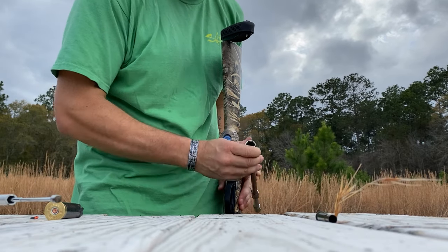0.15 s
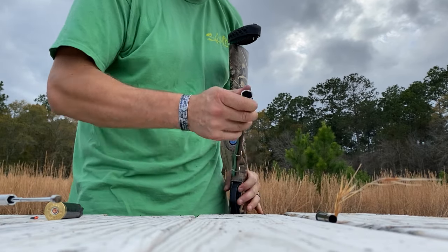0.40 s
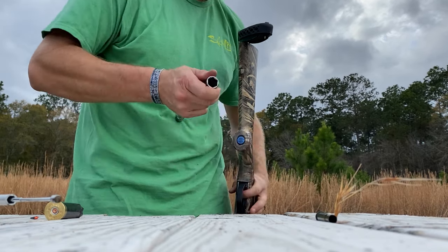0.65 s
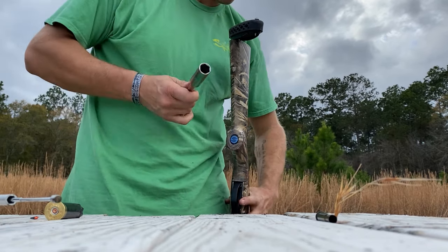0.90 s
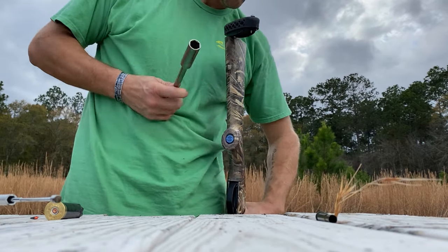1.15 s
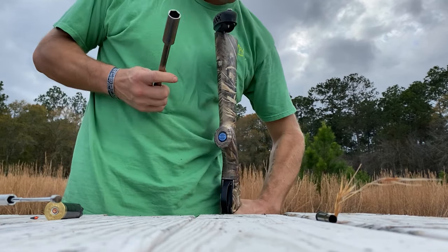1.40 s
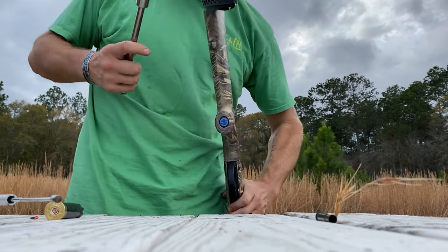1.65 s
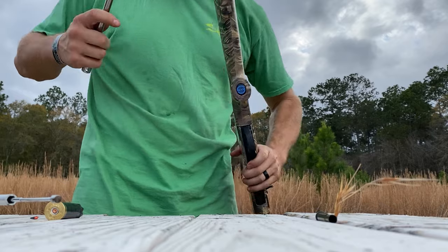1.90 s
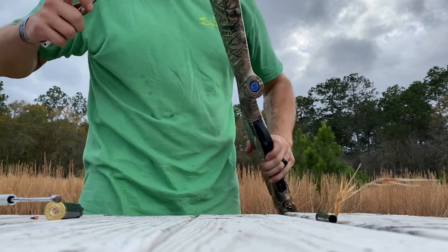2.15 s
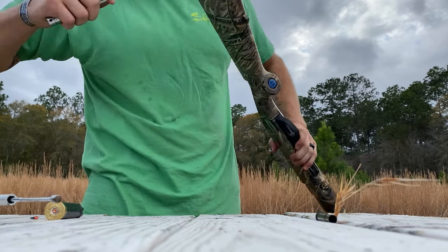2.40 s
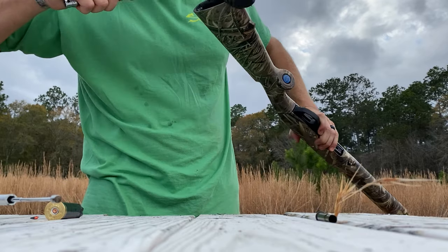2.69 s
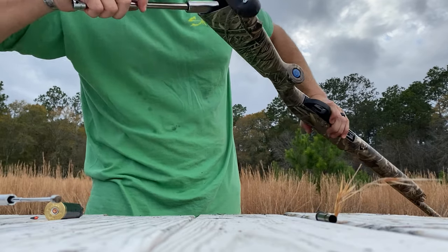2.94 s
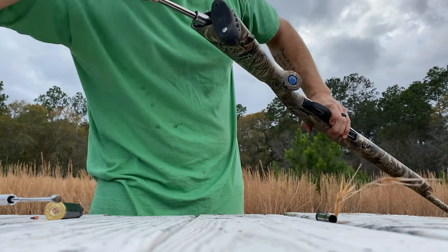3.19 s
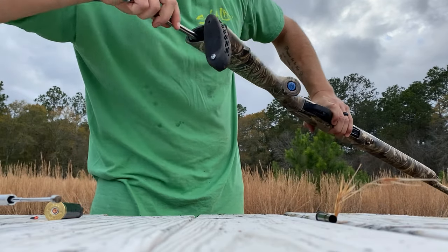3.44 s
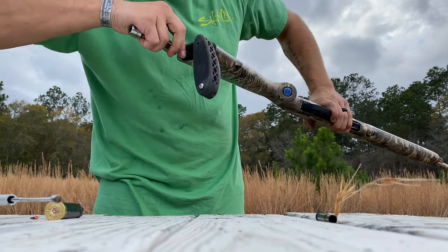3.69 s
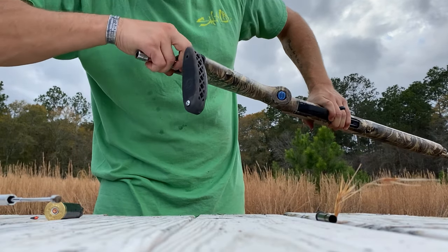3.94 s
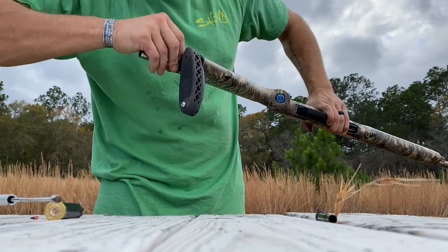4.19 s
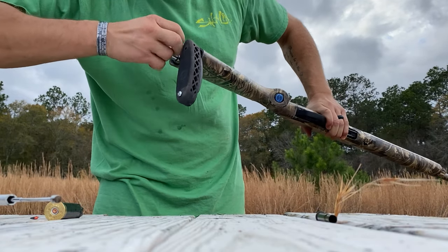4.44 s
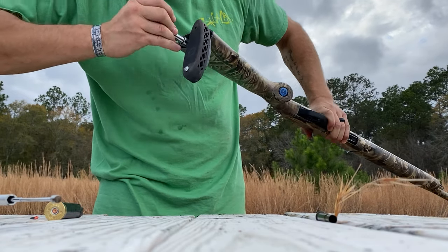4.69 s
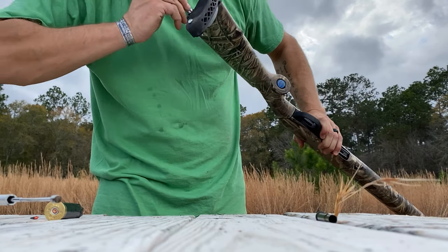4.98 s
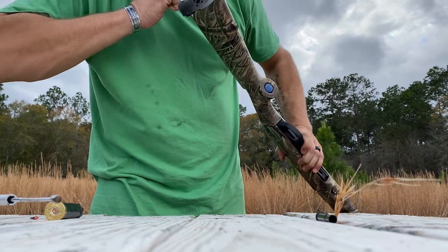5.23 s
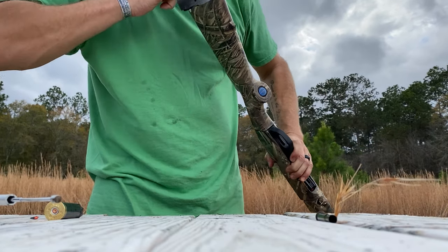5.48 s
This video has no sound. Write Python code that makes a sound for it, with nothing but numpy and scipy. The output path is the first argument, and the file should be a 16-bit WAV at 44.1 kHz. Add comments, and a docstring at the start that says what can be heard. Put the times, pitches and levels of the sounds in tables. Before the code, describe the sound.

Close stereo pickup at an outdoor table by a grassy field. Soft rubbing and cloth rustle with a few small ticks come first, then a loud hollow knock near three seconds as a steel socket tool meets a shotgun stock. It scrapes inward, rattles and clacks hard around four seconds, then gives smaller hollow knocks and rubs. A high cricket, faint trilling insects and low far traffic continue underneath.

```python
"""Outdoors, a steel socket tool is pushed into the hollow stock of a shotgun: it knocks, rubs and rattles inside.
Blows and stick-slip grains ring the modes of cavity, shell, tube, edge and steel; one tick on the tool is dry and dull.
Shaped noise makes far traffic, hissing grass, far insects and rustling cloth; gliding sine pulses make a
cricket and a trilling insect, and short sines make tiny pips.
Two close microphone ports hear it all, the treble out of step between them."""
import sys
import numpy as np
from scipy import signal
from scipy.fft import rfft, irfft
from scipy.io import wavfile

SR = 44100
rng = np.random.default_rng(int(sys.argv[2]) if len(sys.argv) > 2 else 0)


def store_pcm(level_fs):
    """Save levels as 16-bit WAV."""
    pcm = np.round(np.clip(level_fs, -1, 1) * 32767).astype(np.int16)
    wavfile.write(sys.argv[1], SR, np.atleast_2d(pcm).T)


def gain_from_db(level_db):
    """Convert decibel levels to linear amplitude factors (20 dB per decade)."""
    decades = np.asarray(level_db, float) / 20
    return 10 ** decades


N = 246959
TIME = np.arange(N) / SR
HZ = np.maximum(np.fft.rfftfreq(N, 1 / SR), 1)


def rms_one(x):
    """Scale to unit rms."""
    return x / np.sqrt(np.mean(x ** 2) + 1e-20)


def in_time(rows):
    """Read every column of a time curve sample by sample."""
    s, *columns = np.transpose(rows)
    return [np.interp(TIME, s, column) for column in columns]


def at_hz(points):
    """Read a spectrum table at every FFT bin, along log frequency; points below 30 Hz count as 30 Hz."""
    hz, value = np.transpose(points)
    return np.interp(np.log(HZ), np.log(np.maximum(hz, 30)), value)


def coloured(spectrum_db):
    """White noise weighted by a level for every FFT bin."""
    return irfft(rfft(rng.standard_normal(N)) * gain_from_db(spectrum_db), N)


def drift(rate_hz):
    """Slow random wander: straight lines between normal draws, spread about 1."""
    knots = rng.standard_normal(int(TIME[-1] * rate_hz) + 2)
    return np.interp(TIME * rate_hz, np.arange(len(knots)), knots) * np.sqrt(3 / 2)


def dying(times, levels_db, t60_s):
    """An exponential decay started at every given moment; overlapping decays add."""
    kicks = np.zeros(N)
    kicks[np.round(times * SR).astype(int)] = gain_from_db(levels_db)
    return signal.lfilter([1], [1, -gain_from_db(-60 / (t60_s * SR))], kicks + 1e-18)


def crack(times, levels_db, low_hz, high_hz, t60_s):
    """The first instant of a hard contact: a dying burst of noise in one band."""
    burst = dying(times, levels_db, t60_s) * rng.standard_normal(N)
    band = signal.butter(2, [low_hz, high_hz], "band", fs=SR, output="sos")
    return signal.sosfilt(band, burst)


def strike(times, levels_db, modes, rise_s, spread_db, detune, tuning=1):
    """Every blow reaches every mode with its own strength and slightly other pitch, as grip and place change."""
    hz, mode_db, t60_s = np.transpose(modes)[:, :, None]
    chance = rng.standard_normal((len(times), 2 * len(modes)))
    t = TIME[:SR // 8]
    shape = gain_from_db(-60 * t / t60_s) * (1 - np.exp(-t / rise_s)) ** 2
    shape /= shape.max(axis=1, keepdims=True)
    signs = (-1) ** np.arange(len(modes))[:, None]
    out = np.zeros(N + SR)
    for s, level_db, tune, draw in zip(times, levels_db, np.broadcast_to(tuning, len(times)), chance):
        strength, pitch = draw.reshape(2, -1, 1)
        gain = signs * gain_from_db(level_db + mode_db + spread_db * strength)
        tones = np.sin(2 * np.pi * hz * tune * (1 + detune * pitch) * t)
        start = round(s * SR)
        out[start:start + len(t)] += (gain * shape * tones).sum(axis=0)
    return out[:N]


def grains(per_s, spread_db):
    """Random clicks of uneven size and sign, scaled to rms 1."""
    sizes = gain_from_db(spread_db * np.minimum(rng.exponential(1, N), 4)) * rng.choice([-1, 1], N)
    return rms_one(sizes * (rng.random(N) < per_s / SR))


def excite(drive, modes, ring_scale, tuning=1):
    """Drive modes of movable pitch: shift each to zero, smooth, shift back; a white drive keeps its rms."""
    out, power = 0, 0
    turns = np.cumsum(np.broadcast_to(tuning, N)) * 2 * np.pi / SR
    for k, (hz, mode_db, t60_s) in enumerate(modes):
        r = gain_from_db(-60 / (t60_s * ring_scale * SR))
        spin = np.exp(1j * hz * turns)
        smooth = signal.lfilter([1], [1, -r], drive / spin + 1e-18)
        out = out + gain_from_db(mode_db) * (-1) ** k * np.imag(smooth * spin)
        power += gain_from_db(2 * mode_db) / (2 * (1 - r * r))
    return out / np.sqrt(power)


# how far the background differs between the ports: pitch_hz, level_db against the like part
DIFFUSE_SPECTRUM = [(60, -35), (200, -11), (500, -2.5), (1200, -4.5), (2500, -12.5), (5000, -8.5),
                    (11000, -16.5), (14000, -28)]


def diffuse():
    """Spectrum of the unlike part against the like part, in dB per bin."""
    return at_hz(DIFFUSE_SPECTRUM)


# rumble and grass as one noise colour: pitch_hz, relative level_db per Hz
AIR_SPECTRUM = [(20, -35.5), (31, -12), (40, -44), (50, -5.5), (80, 2), (115, -5.5), (150, -14.5),
                (237, -17), (306, -26.5), (395, -22.5), (763, -22), (1200, -28.5), (2120, -38),
                (4000, -52.5)]
# breeze and traffic: time_s, rumble level_db, grass level_db (both before the trims below)
GUSTS = [(0.0, -53.5, -53), (0.4, -53, -57.5), (1.0, -55.5, -59), (1.5, -55.5, -58), (2.3, -56, -61),
         (3.2, -52.5, -59), (3.9, -55, -60), (4.9, -54, -56), (5.2, -55, -59), (5.6, -55, -59)]


def traffic_and_grass():
    """Noise split at 170 Hz into rumble and grass; a resonance in the rumble is a far engine's hum."""
    rumble_db, grass_db = in_time(GUSTS)
    colour = at_hz(AIR_SPECTRUM) - 60 * (HZ > 4200)
    air = coloured(colour)
    low = signal.sosfiltfilt(signal.butter(2, 170, fs=SR, output="sos"), air)
    hum = excite(low, [(55.2, 0, 0.1856)], 1)  # pitch_hz, level_db, t60_s
    rumble = (rms_one(low) + gain_from_db(-2) * rms_one(hum)) * gain_from_db(rumble_db + 1.0)
    grass = rms_one(air - low) * gain_from_db(grass_db - 1.5 + 1.15 * drift(5.714))
    # the unlike part has opposite sign at the two ports
    unlike = gain_from_db(-55) / np.std(air) * coloured(colour + diffuse()) * [[1], [-1]]
    return rumble + grass, unlike


# far insects and leaves: pitch_hz, relative level_db per Hz
CHORUS_SPECTRUM = [(3500, -24.5), (4700, -6.5), (5200, -8.5), (6200, -3), (7000, -8.5), (7500, 1.5),
                   (8500, 7.5), (9400, -7), (9750, -25), (10500, -27), (15500, -10.5), (16300, -47)]


def far_insects():
    """Treble noise of insects and leaves whose level throbs fast and wanders."""
    throb_per_s, throb_db = 47.0, 2.2
    colour = at_hz(CHORUS_SPECTRUM) - 60 * (HZ < 3300)
    throb = throb_db * np.sin(2 * np.pi * throb_per_s * TIME + drift(3.0))
    like = gain_from_db(-76.5 + 1.2 * drift(42.0) + throb) * rms_one(coloured(colour))
    unlike = gain_from_db(-81.5) * np.array([rms_one(coloured(colour + diffuse())) for port in range(2)])
    return like, unlike


# cloth rustles: peak_s, level_db (before the cloth gains), fade_s for a fall of 20 dB
RUSTLES = [(.03, -80, .045), (.19, -86, .4), (.65, -94, .12), (.84, -80, .14), (1.04, -81.5, .16),
           (1.28, -75, .02), (1.87, -78.5, .055), (2.3, -95, .3), (2.59, -92, .1), (2.97, -80, .03),
           (3.34, -73, .03), (3.42, -86, .15), (3.62, -79.5, .28), (3.84, -79, .02), (3.885, -82, .045),
           (3.96, -85, .1), (4.15, -72, .015), (4.25, -76, .035), (4.62, -91, .15), (4.82, -78, .05),
           (5.02, -81.5, .08), (5.24, -90, .1)]


def rustling():
    """Level curve of the cloth in dB: each rustle rises fast and fades evenly, down to a resting level."""
    rise_share, rest_db = 0.6, -104  # rise time as a share of the fade; level between rustles
    s, level_db, fade_s = np.transpose(RUSTLES)[:, :, None]
    away_s = np.where(TIME > s, TIME - s, (s - TIME) / rise_share)
    return np.maximum((level_db - 20 * away_s / fade_s).max(axis=0), rest_db)


# colour of the cloth: pitch_hz, relative level_db per Hz
CLOTH_SPECTRUM = [(3000, -35.5), (6000, -1.5), (10000, 0.5), (15500, 4), (16300, -56.5)]


def cloth():
    """Treble noise follows the rustle curve with a quick random flutter, partly unlike at the ports."""
    near = at_hz(CLOTH_SPECTRUM)
    around = near + diffuse()
    level = gain_from_db(rustling() + 2.9 * drift(60.0))
    noises = level * [rms_one(coloured(colour)) for colour in (near, around, around)]
    return gain_from_db(8.0) * noises[0], gain_from_db(5.0) * noises[1:]


def background():
    """Sum traffic, grass, far insects and cloth into a like part and an unlike part."""
    likes, unlikes = zip(traffic_and_grass(), far_insects(), cloth())
    return sum(likes), sum(unlikes)


def pulse(centre_s, width_s, level_db, hz, glide_hz):
    """One wing stroke: a sine under a bell, gliding by glide_hz from one width before centre to one after."""
    first = max(int((centre_s - 3 * width_s) * SR), 0)
    t = TIME[first:int((centre_s + 3 * width_s) * SR)] - centre_s
    turns = hz * t + glide_hz * t ** 2 / (4 * width_s)
    tone = np.sin(2 * np.pi * turns + rng.uniform(0, 2 * np.pi))
    return first, gain_from_db(level_db) * np.exp(-.5 * (t / width_s) ** 2) * tone


# insect trills: start_s (first pulse), end_s, swell_s (full level after 0.8 of it), level_db
TRILL_TIMES = [(.0044, .35, 0.017, -73), (1.3, 1.88, 0.27, -72), (2.914, 3.69, .2, -72.5),
               (4.517, 5.19, 0.17, -72)]


def trills():
    """A steady run of wing strokes, each falling in pitch; the run swells in and its strokes vary in level."""
    per_s = 45.72
    out = np.zeros(N)
    for start_s, end_s, swell_s, level_db in TRILL_TIMES:
        for t in np.arange(start_s, end_s, 1 / per_s):
            fade_db = 20 * np.log10(min((t - start_s) / swell_s + .2, 1))
            stroke_db = level_db + fade_db + 2.2 * rng.standard_normal()
            first, tone = pulse(t, 0.002, stroke_db, 5990, -450.0)
            out[first:first + len(tone)] += tone
    return out


# cricket chirps: start_s (first pulse), level_db (before the weakening at both ends)
CHIRP_TIMES = [(0.199, -59.5), (0.493, -61.5), (0.933, -60.5), (1.222, -59), (1.555, -60.5), (1.791, -58),
               (1.997, -64), (2.219, -60), (2.451, -60), (2.67, -59), (2.948, -59.5), (3.23, -58.5),
               (3.527, -58.5), (3.834, -61), (4.146, -72.5), (4.459, -60.5), (4.707, -60.5), (4.996, -59.5),
               (5.278, -59.5)]


def cricket():
    """Each chirp is a row of wing strokes that start weak and low, climb, and sag at the end."""
    chirp_s, stroke_gap_s = 0.065, 0.0099
    out = np.zeros(N)
    for start_s, level_db in CHIRP_TIMES:
        for t in np.arange(0, chirp_s, stroke_gap_s):
            lack = np.exp(-t / .012) + np.exp((t - chirp_s) / .007)
            centre_s = start_s + t + 0.00037 * rng.standard_normal()
            hz = 9150 - 420 * lack + 40 * rng.standard_normal()
            first, tone = pulse(centre_s, 0.002, level_db - 5.0 * lack, hz, 60.0)
            out[first:first + len(tone)] += tone
    return out


# tiny pips: start_s, level_db, pitch_hz
PIP_TIMES = [(.563, -71, 5200), (.605, -72, 5150), (.638, -70, 5170), (0.773, -62, 5470), (.947, -63, 5400),
             (0.98, -63, 5630), (1.195, -62, 2880), (1.26, -60, 2850), (1.324, -62, 2960),
             (1.337, -53.5, 2870), (1.395, -65, 2920), (1.496, -60, 2950)]


def pips():
    """Each pip rings one short mode, 60 dB down after a fixed count of cycles."""
    cycles = 98.0
    return sum(strike([s], [level_db], [(hz, 0, cycles / hz)], 0.0005, 0, 0) for s, level_db, hz in PIP_TIMES)


# a dry, dull tick on the tool: start_s, level_db, modes as (pitch_hz, level_db, t60_s)
TOOL_TICK = (.774, -45, [(2260, 0, .0045), (1690, -4, .011)])


def dry_tick():
    """A dull, short tick of two quickly dying modes."""
    s, level_db, modes = TOOL_TICK
    return strike([s], [level_db], modes, 0.0005, 0, 0)


# the tool sinks into the stock and retunes tube and overtone: time_s, first tube mode's pitch_hz
DEPTH_CURVE = [(2.9, 1252), (3.2, 1280), (3.35, 1230), (3.42, 1450), (3.52, 1346), (3.63, 1223),
               (3.72, 1200), (4.3, 1183), (4.6, 1179), (5.0, 1172), (5.6, 1162)]


def tube_tuning(s):
    """Pitch ratio of the tube modes and their overtone at the given times."""
    return np.interp(s, *np.transpose(DEPTH_CURVE)) / TUBE_MODES[0][0]


def settling():
    """A knock leaves the tool shuffling: a strength that dies away after each one."""
    s, cavity_db = np.transpose(KNOCK_TIMES)[:2]
    return dying(s, cavity_db - 37, 0.35)


# sliding contact: time_s, level_db in cavity and shell modes, level_db in edge modes
RUB_CURVE = [(0, -66, -84), (.12, -54, -68), (.35, -69, -82), (1.05, -76, -77), (1.2, -63, -74),
             (1.6, -63, -75.5), (1.75, -77, -88), (2.9, -74, -93), (3.14, -80, -95), (3.28, -58, -78),
             (3.44, -61, -72), (3.49, -46.5, -66), (3.55, -47, -66), (3.62, -60, -64), (3.72, -63, -64),
             (3.78, -51, -64), (3.83, -64, -66), (4.04, -57, -72), (4.38, -63.5, -84), (4.68, -59, -86),
             (4.87, -66, -95), (5.05, -55, -75), (5.2, -61, -94), (5.35, -87, -84), (5.44, -65, -88),
             (5.6, -82, -89)]
# loose tool chattering: start_s, end_s, cavity and shell level_db, tube level_db, edge level_db
RATTLE_TIMES = [(3.17, 3.192, -45, -46.5, -63.5), (3.722, 3.758, -58, -47.5, -64),
                (3.885, 3.93, -50.5, -41, -51), (3.923, 3.982, -37.5, -36, -49),
                (4.043, 4.059, -49, -44, -70), (4.097, 4.119, -45, -53, -58),
                (4.187, 4.216, -45.5, -48, -56), (4.224, 4.26, -36.5, -32.5, -36.5),
                (4.282, 4.313, -44, -65, -58), (4.674, 4.686, -52, -58, -69),
                (4.809, 4.821, -47.5, -53, -64)]


def sliding():
    """Fine stick-slip under the hand and bursts of hard chatter drive the same modes."""
    rattle_db = np.full((4, N), -140.0)
    for start_s, end_s, low_db, tube_db, edge_db in RATTLE_TIMES:
        steel_db = edge_db - 10.5
        during = (TIME >= start_s) & (TIME < end_s)
        rattle_db[:, during] = np.array([low_db, tube_db, edge_db, steel_db])[:, None]
    dull_db, bright_db = in_time(RUB_CURVE)
    rub = gain_from_db([dull_db, (dull_db + bright_db) / 2 - 3.0, bright_db])
    rub = rub + settling() * gain_from_db([[0], [-12.0], [-22.0]])
    rub = rub * grains(4000.0, 2.1) * gain_from_db(1.2 * drift(30.0))
    chatter = gain_from_db(rattle_db) * grains(2000.0, 5.8)
    low_drive, tube_drive, edge_drive = rub + chatter[:3]
    tuning = tube_tuning(TIME)
    # steady contact shortens the ring of each mode
    low = excite(low_drive, CAVITY_MODES + SHELL_MODES, 0.51)
    tube = excite(tube_drive, TUBE_MODES, 0.92, tuning)
    edge = excite(edge_drive, EDGE_MODES + STEEL_MODES[:1], 0.6)
    overtone = gain_from_db(-2.5) * excite(edge_drive, OVERTONE_MODES, 0.85, tuning)
    steel = excite(chatter[3], STEEL_MODES, 0.51)
    return low + tube + edge + overtone + steel


# bright steel clicks: start_s, level_db, duller crack's level_db over the click (before the trims below)
CLICK_TIMES = [(0.7731, -54.5, 5), (0.981, -53.5, 2), (1.277, -47, 4), (1.8583, -56.5, 5),
               (2.003, -53.5, 9), (2.0408, -56, -6), (2.577, -59, -3), (2.9661, -43.5, 15), (3.237, -59, 6),
               (3.3233, -54.5, 18), (3.3432, -50, 0), (3.8833, -37.5, 18), (3.9035, -41.5, 6),
               (3.9332, -47, 23), (3.9524, -52.5, 16), (3.969, -51, 21), (3.9774, -40.5, 12),
               (4.0587, -56, 27), (4.0978, -30, 12), (4.14, -29, 23.5), (4.1784, -31.5, 1),
               (4.1842, -42, 15), (4.203, -55.5, 2.5), (4.226, -43, 14), (4.2337, -39, 0),
               (4.2424, -38.5, -3), (4.2524, -31.5, 8), (4.4873, -60, 12.5), (4.6099, -47, 22),
               (4.8114, -52.5, -5), (4.9666, -53, 18)]
# modes of the steel: pitch_hz, level_db, t60_s after a blow
STEEL_MODES = [(4415, 0.3, 0.005), (5400, -6.5, 0.011), (6020, -2.5, 0.011), (7140, -10, 0.008),
               (9200, -8, 0.0083), (11340, -12.5, 0.0056), (11200, -20, .008), (13800, -3, .035),
               (14030, -7, .04), (14400, -15, .03)]


def clicks():
    """Hard steel contact: ringing steel modes, a bright crack and a duller crack."""
    s, level_db, dull_db = np.transpose(CLICK_TIMES)
    steel = strike(s, level_db - 9.0, STEEL_MODES, 0.000097, 3.0, 0.031)
    bright = crack(s, level_db - 1.5, 4400, 9800, 0.011)
    return steel + bright + crack(s, level_db + dull_db - 3.0, 1800, 3320, 0.026)


# tool against stock: start_s (before the lead below), cavity level_db,
# then shell, tube and edge level_db over the cavity (all before the trims below)
KNOCK_TIMES = [(1.171, -52.5, 2, -14, -14.5), (1.334, -50.5, 5.5, 0, -5.5), (1.493, -61.5, 9, -12, -3.5),
               (2.97, -12.5, -7.5, -9, -17), (3.054, -54, -2, -21, -14.5), (3.177, -51.5, 15.5, 13.5, -2),
               (3.185, -41.5, 4.5, -27.5, -14), (3.326, -30.5, 3.5, -4, -11.5),
               (3.343, -28, -5.5, -12.5, -18), (3.477, -49, 1, -18, -16), (3.623, -35, -19, -10.5, -31),
               (3.732, -44.5, -29, -18, -19), (3.743, -50, -23, -.5, -16), (3.862, -60, 0, -6, -13),
               (3.883, -41.5, 7.5, 6, 1.5), (3.898, -35.5, -7, -23, -2.5), (3.933, -60, 20.5, 27.5, 24.5),
               (3.954, -44.5, 0, 6, -9), (3.977, -45.5, 10, 14, -3), (4.022, -49.5, -16, -18, -23),
               (4.057, -34, -1.5, 1.5, -5), (4.096, -50.5, 0, 14.5, 15.5), (4.141, -14, -11.5, 3, -11),
               (4.177, -33, -12.5, -2, -1.5), (4.201, -38.5, -7.5, -5.5, -26.5),
               (4.227, -36.5, -21, 2.5, -2), (4.241, -36.5, 2.5, 9, -6.5), (4.273, -31, -4, 2, -8),
               (4.304, -42, -22, -5, -10.5), (4.386, -51, -4.5, -13.5, -17.5),
               (4.44, -45.5, -.5, -5.5, -12.5), (4.489, -38, -10, .5, -14.5), (4.594, -39, -9, 1, -15),
               (4.61, -27, -.5, -9.5, -14.5), (4.621, -46.5, 4, 4, -3), (4.689, -47.5, -11, -10, -20),
               (4.771, -45, -20, -19, -29), (4.793, -40, -7, -3, -20), (4.812, -49, .5, 1, -11),
               (4.966, -27, 1, -9.5, -10), (5.013, -49.5, 7, -10, -11.5), (5.036, -40.5, 2, -18.5, -20),
               (5.529, -30.5, -.5, -19, -26), (5.582, -50, -8, -24, -35)]
# modes of stock and tool by family: pitch_hz, level_db, t60_s after a blow
CAVITY_MODES = [(391.2, 1, 0.065), (481.2, -4.5, 0.048), (410.6, -12.5, 0.057), (202, -26.5, 0.061),
                (580, -15.5, 0.024)]
SHELL_MODES = [(672, -1, 0.031), (781, -5.5, 0.038), (825.5, -4, 0.026)]
TUBE_MODES = [(1200, -3.5, 0.022), (1260.5, -8.5, .035), (1143.5, -8, 0.06), (1382, -11.5, 0.01)]  # pitches before the retuning by depth
OVERTONE_MODES = [(1805, -2.5, .025), (1945, 0.5, 0.024), (1650, -9, 0.036)]  # retuned along with the tube
EDGE_MODES = [(2300, -1.5, 0.028), (2560, -5.5, 0.022), (2775, 0, 0.032), (3350, -5, 0.013),
              (3834, -19, 0.049)]


def knocks():
    """Blows ring every family: low modes swell, high ones speak at once; soft blows start earlier, with less edge."""
    s, cavity_db, shell_db, tube_db, edge_db = np.transpose(KNOCK_TIMES)
    soft = np.clip(-edge_db / 17.2, 0, 1)
    s = s - .0006 - 0.002143 * soft
    tuning = tube_tuning(s)
    overtone_db = cavity_db + edge_db - 9.5 + 10.5 * soft
    rim_db = cavity_db + edge_db + 1.4 - 7.6 * soft
    cavity = strike(s + 0.0016, cavity_db + 0.9, CAVITY_MODES, 0.003, 1, 0.011)
    shell = strike(s, cavity_db + shell_db + 0.8, SHELL_MODES, 0.0019, 1.8, 0.059)
    tube = strike(s, cavity_db + tube_db + 2.14, TUBE_MODES, .0019, 2.8, 0.011, tuning)
    overtone = strike(s, overtone_db, OVERTONE_MODES, 0.00087, 3.0, 0.011, tuning)
    rim = strike(s, rim_db, EDGE_MODES, 0.0004, 3.3, 0.03)
    return cavity + shell + tube + overtone + rim


def table_echo(x):
    """A few dull reflections from table top and chest."""
    dull = signal.lfilter([.4], [1, -.6], x)
    echoes = [(.0031, -16), (.0074, -13.5), (.013, -22)]  # lag_s, level_db
    return sum(gain_from_db(level_db) * np.roll(dull, round(lag_s * SR)) for lag_s, level_db in echoes)


# phase between the ports: pitch_hz, lead_rad of left over right
PORT_LEAD = [(90, 0), (200, -.15), (330, -.4), (690, -.55), (1700, .1), (2410, .7), (2670, 1.3),
             (3960, 1.5), (4820, 3), (5430, 6.5), (6030, 7), (9300, 8.3), (10300, 8.8), (13000, 9.15),
             (14500, 9.05), (15200, 9.4)]
# level between the ports: pitch_hz, level_db of left over right
PORT_LEVEL = [(210, 0), (330, 1), (500, .5), (770, -1.5), (1790, -2), (2740, -4), (4190, -2), (6410, 0)]


def two_ports(sound):
    """Split a sound to left and right with a phase and level difference that depends on pitch."""
    spectrum = rfft(sound)
    half = gain_from_db(at_hz(PORT_LEVEL) / 2) * np.exp(.5j * at_hz(PORT_LEAD))
    return np.array([irfft(spectrum * half, N), irfft(spectrum / half, N)])


def scene():
    """All sources reach the two ports; the unlike background is added at each port."""
    gun = knocks() + clicks() + sliding()
    like, unlike = background()
    sound = gun + table_echo(gun) + pips() + dry_tick() + cricket() + trills() + like
    return two_ports(sound) + unlike


def roll_off(x):
    """The treble ends steeply here."""
    return signal.sosfilt(signal.butter(12, 16100, fs=SR, output="sos"), x)


def record(dry):
    """Send the mix of both ports through the last stage of the chain."""
    return roll_off(dry)


dry = scene()
out = record(dry)
store_pcm(out)
```